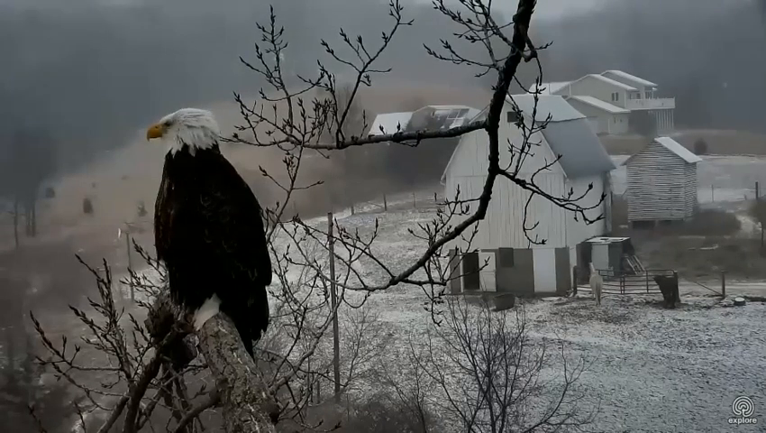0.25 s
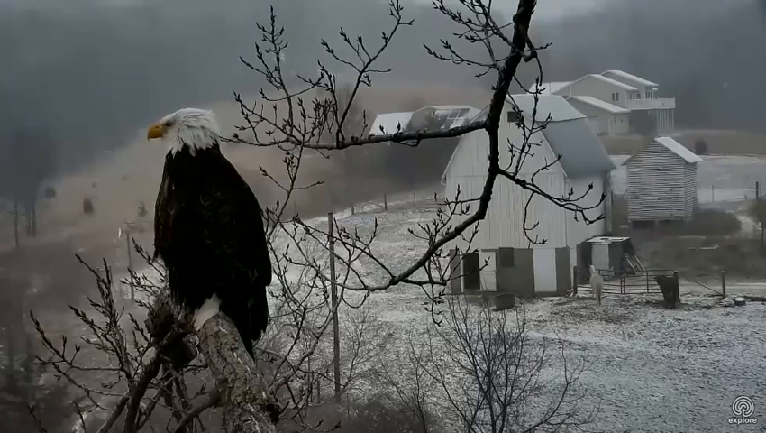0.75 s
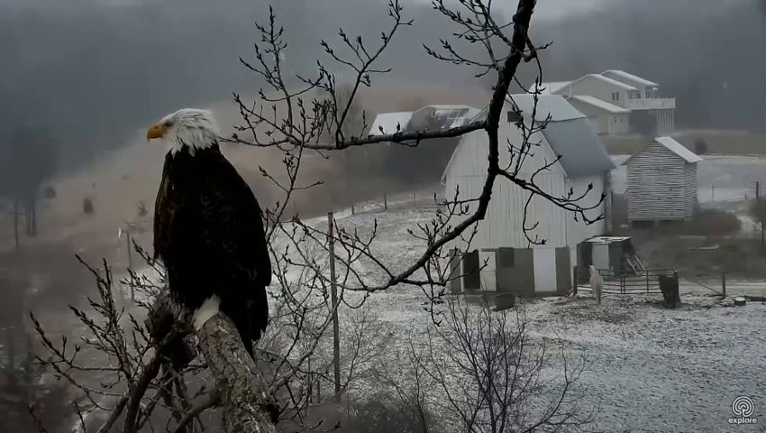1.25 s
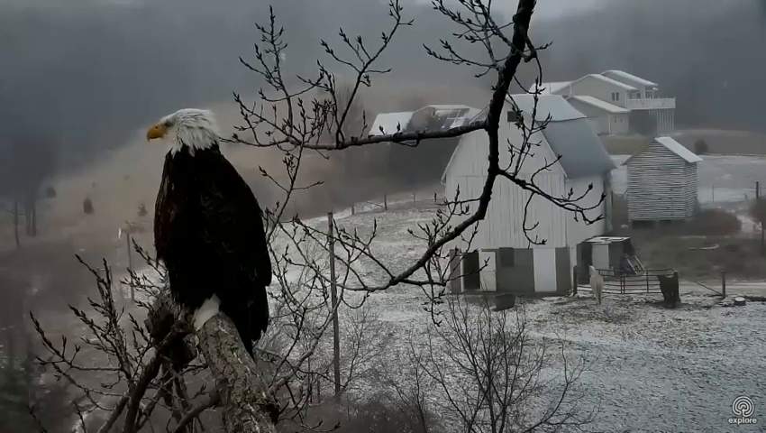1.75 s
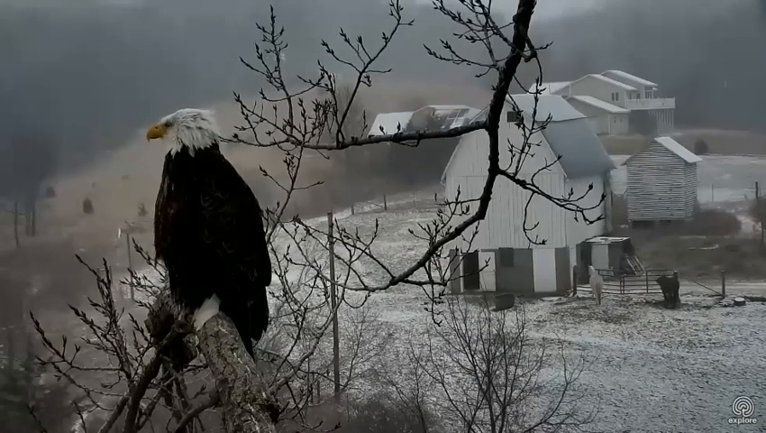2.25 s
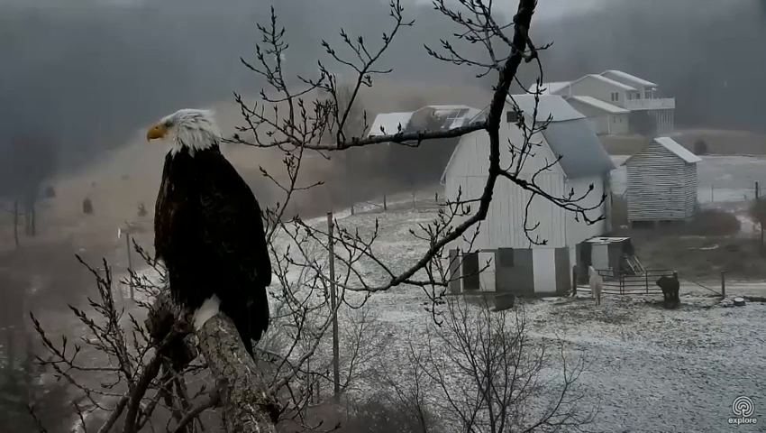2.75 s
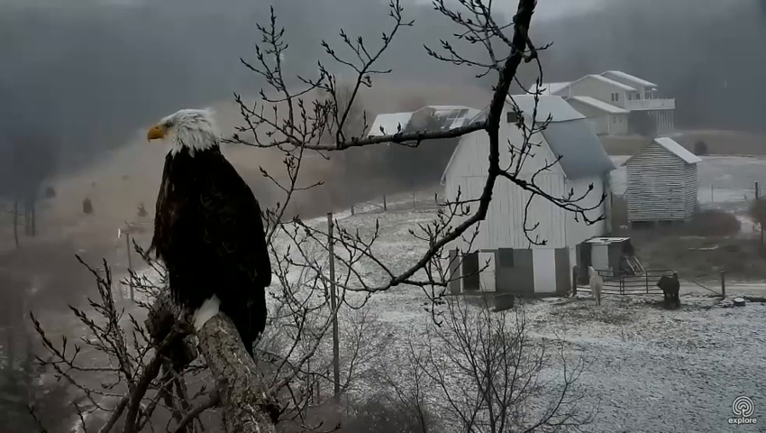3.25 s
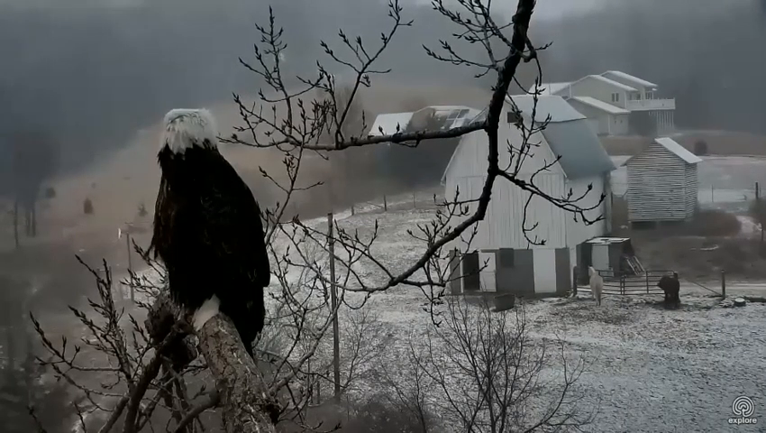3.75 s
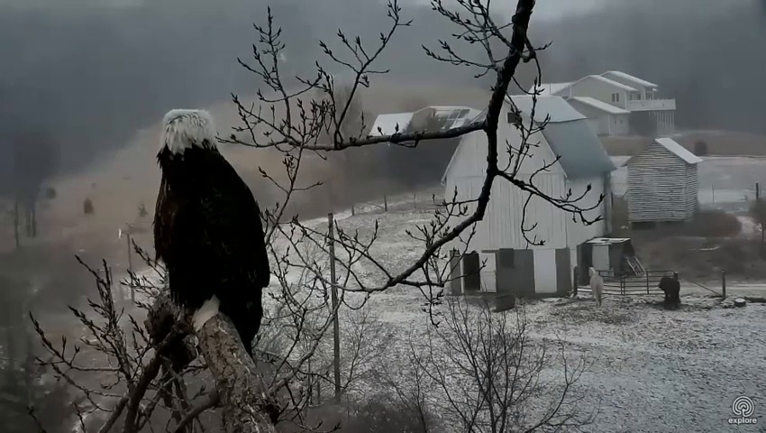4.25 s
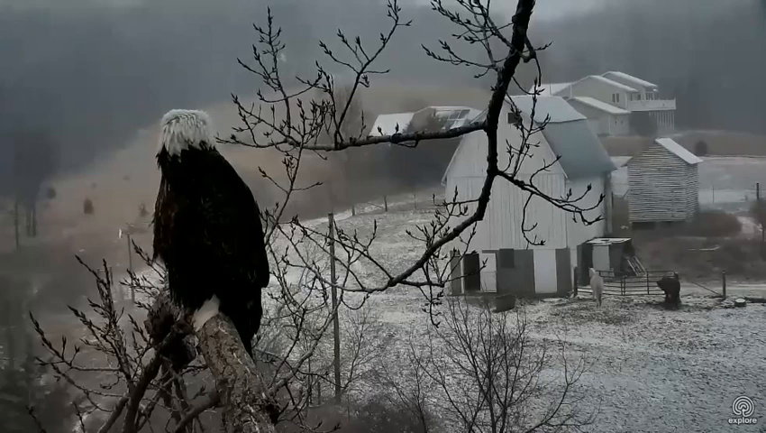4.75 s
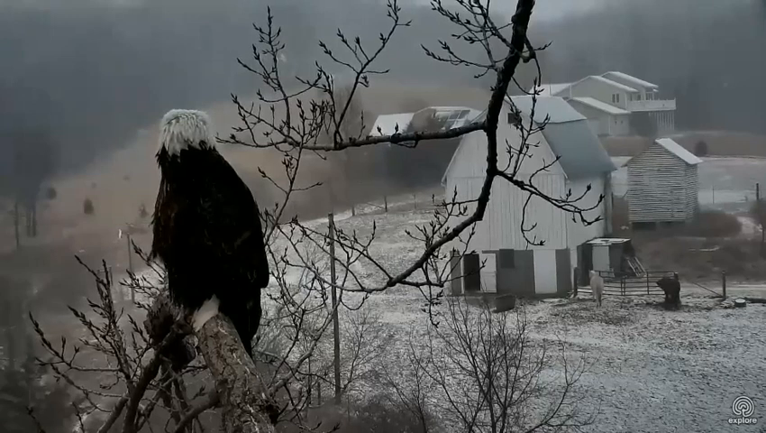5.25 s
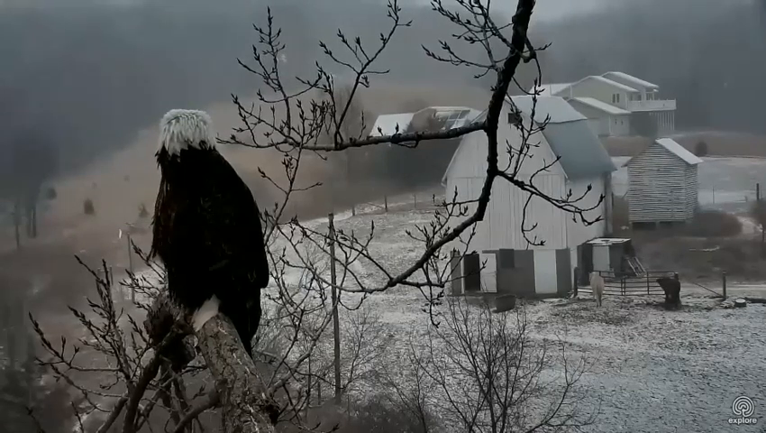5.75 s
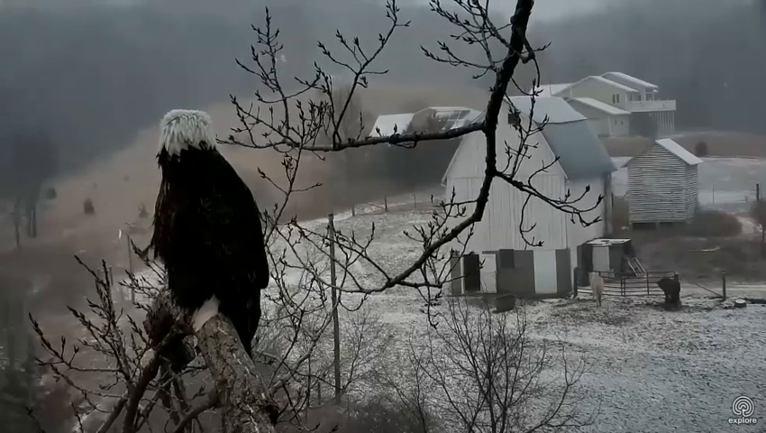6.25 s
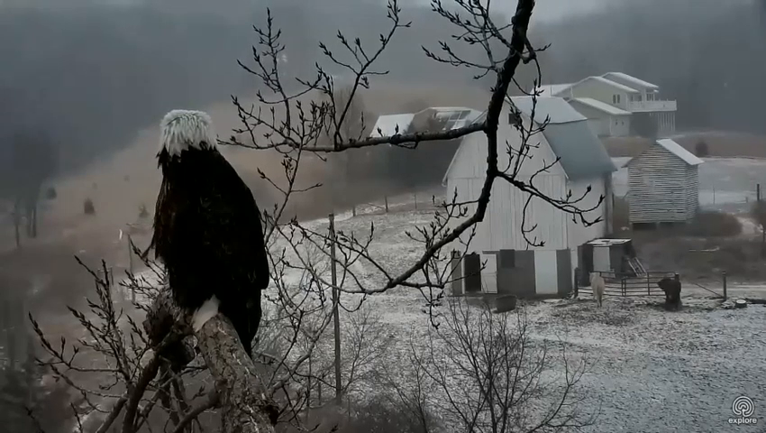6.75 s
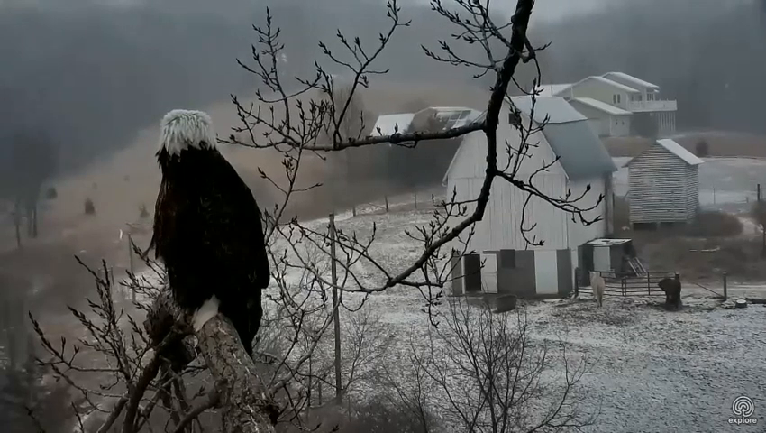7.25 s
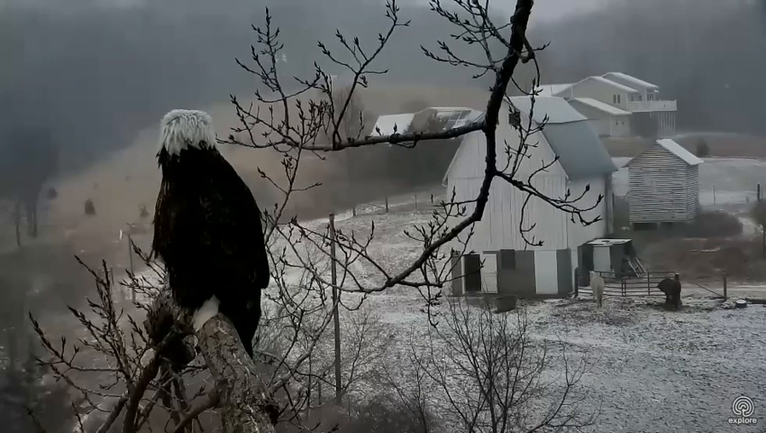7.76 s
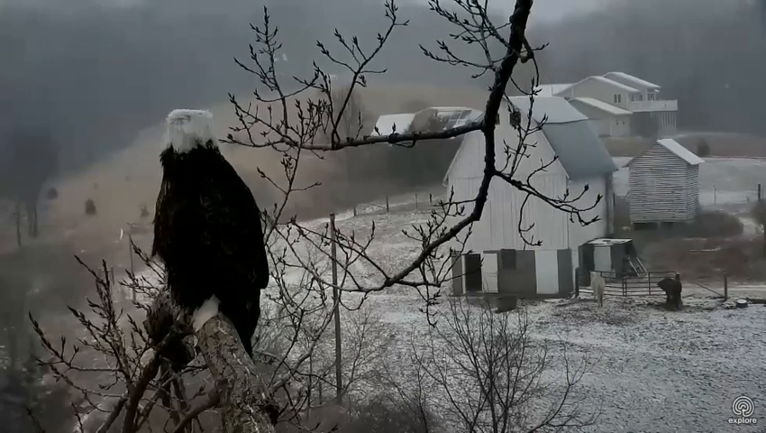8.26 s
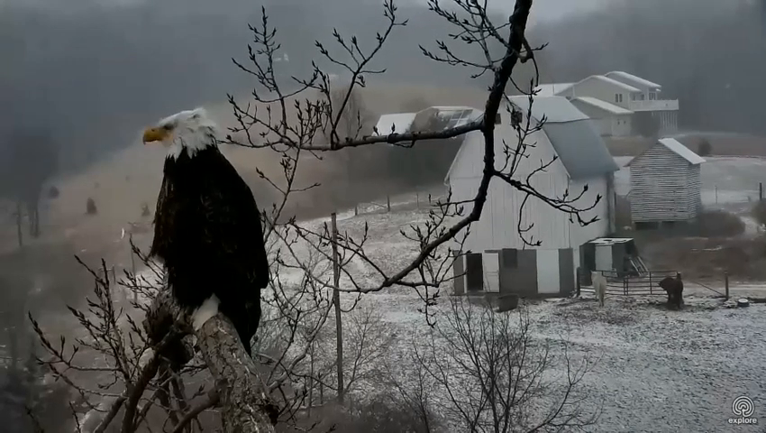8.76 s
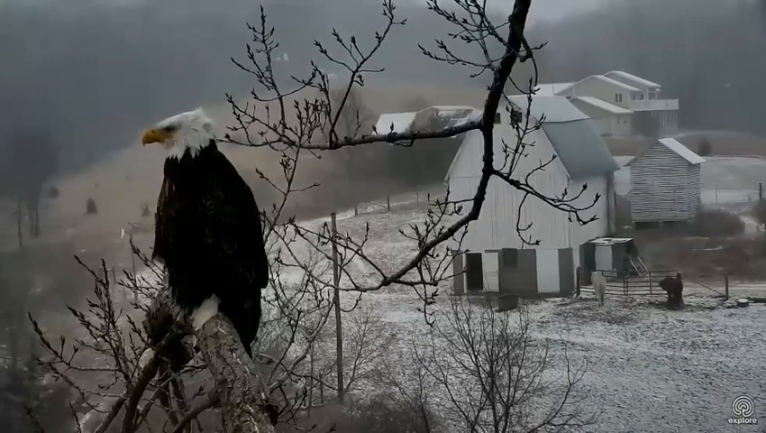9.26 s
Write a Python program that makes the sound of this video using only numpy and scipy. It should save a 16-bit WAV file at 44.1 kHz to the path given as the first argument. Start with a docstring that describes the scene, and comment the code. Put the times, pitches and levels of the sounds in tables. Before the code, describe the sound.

In open snowy farmland, low wind throbs and thumps against a low-quality microphone. Faint high tweets from small songbirds come singly and in little clusters, with a few tiny ticks of flakes on the housing. Late on, one nearer bird gives a short harsh buzz among falling chirps, a distant twitter follows, and the gusts grow strongest at the close. The large perched bird stays silent.

```python
"""Tree over snowy fields: wind buffets an outdoor camera microphone while small birds call and flakes tick.
Wind is shaped noise in four eddy sizes; the far flock is many overlapping glides in air noise.
Nearer birds are gliding sines, a blurred twitter and one buzzy song of pulses through throat resonances.
Flakes ring the housing. The camera samples at 8 kHz; its weak playback filter leaves mirror images above 4 kHz."""
import sys
import numpy as np
from scipy import signal
from scipy.fft import rfft, irfft
from scipy.io import wavfile
from scipy.ndimage import uniform_filter1d

SR = 44100
rng = np.random.default_rng(int(sys.argv[2]) if len(sys.argv) > 2 else 0)


def to_wav(sig):
    """Store sig (one row per channel, or 1-D mono) as 16-bit WAV at the path in sys.argv[1].

    Samples outside -1..1 are clipped; the rate is SR.
    """
    pcm = np.clip(np.atleast_2d(sig), -1, 1) * 32767
    pcm = np.round(pcm).astype(np.int16)
    wavfile.write(sys.argv[1], SR, pcm.T)  # frames by channels


N = 419391
T = np.arange(N) / SR
BINS_HZ = np.fft.rfftfreq(N, 1 / SR)


def undb(db):
    """Amplitude factor of a level in dB."""
    return 10 ** (np.asarray(db) / 20)


def level(x, db):
    """Scale x to an RMS level in dB."""
    return x * undb(db) / np.sqrt(np.mean(x ** 2))


def colour(x, points):
    """Shape the spectrum of x by (Hz, dB) points joined on a log-frequency axis."""
    hz, db = np.transpose(points)
    gain_db = np.interp(np.log(BINS_HZ + 1e-3), np.log(hz), db)
    return irfft(rfft(x) * undb(gain_db), N)


def ring(x, modes):
    """Sum of parallel (Hz, width Hz, dB) resonances driven by x."""
    return sum(undb(db) * signal.lfilter(*signal.iirpeak(hz, hz / width_hz, SR), x) for hz, width_hz, db in modes)


def walk(rate_hz):
    """Random levels held 1 / rate_hz seconds and smoothed twice; spread near 1."""
    k = int(SR / rate_hz)
    steps = np.repeat(rng.standard_normal(N // k + 1), k)
    return 1.3 * uniform_filter1d(uniform_filter1d(steps, k), k)[:N]


def whistle(rows, fade_s=.006, waver=None):
    """Span and sound of a sine gliding along (s, Hz, dB) rows, with soft ends outside the rows."""
    s, hz, db = np.transpose(rows)
    first = max(int((s[0] - fade_s) * SR), 0)
    last = min(int((s[-1] + fade_s) * SR), N)
    span = slice(first, last)
    t = T[span]
    ends = np.clip(np.minimum(t - s[0], s[-1] - t) / fade_s + 1, 0, 1)
    fade = np.sin(np.pi / 2 * ends) ** 2
    pitch_hz = np.interp(t, s, hz) * (1 if waver is None else waver[span])
    phase = 2 * np.pi * np.cumsum(pitch_hz) / SR
    return span, np.sqrt(2) * undb(np.interp(t, s, db)) * fade * np.sin(phase)


def add(out, span, sound):
    """Mix a sound into its span."""
    out[span] += sound


def wind():
    """Four eddy sizes press on the membrane; two swell at random around the wind levels, all share a quick flap."""
    # uneven wind loudness over time, partly chance flutter, before swells and flap:
    # (time [s], rumble [dB], buffeting [dB], flutter [dB], rush [dB])
    wind_levels = [(0.0, -34, -43, -51.5, -57), (0.08, -32, -37, -44.5, -55),
                   (0.29, -31.5, -45, -49.5, -63.5), (0.48, -38.5, -45.5, -44.5, -59.5),
                   (0.84, -29.5, -33.5, -47, -53.5), (0.9, -47, -37.5, -49, -57),
                   (0.95, -30.5, -42, -44, -57), (1.35, -37.5, -37, -46.5, -57.5),
                   (2.86, -36, -41, -50, -57.5), (3.55, -39.5, -41, -51.5, -62.5),
                   (4.16, -32, -40, -51, -58), (4.42, -43, -35.5, -51, -62), (4.47, -34, -37.5, -46.5, -59),
                   (4.82, -45.5, -44.5, -52, -60), (4.9, -31, -36.5, -50.5, -60.5),
                   (5.06, -41.5, -42, -51.5, -63.5), (5.3, -27, -40, -46, -59.5),
                   (5.48, -42.5, -37.5, -48.5, -59.5), (6.12, -35, -38, -50.5, -59),
                   (6.67, -35, -37, -47.5, -58.5), (6.78, -42, -42, -49, -62), (6.89, -29, -41, -44, -56.5),
                   (7.07, -39, -31, -44.5, -55.5), (7.47, -30, -37, -42, -55), (8.08, -38, -37, -47, -56.5),
                   (8.21, -31.5, -37, -41, -53.5), (8.26, -26.5, -44, -49, -66),
                   (8.37, -31.5, -36, -43, -52.5), (8.62, -35, -33.5, -39.5, -49.5),
                   (9.0, -36, -35, -41, -51), (9.3, -33.5, -33.5, -38.5, -46.5),
                   (9.4, -24, -32.5, -41, -43.5), (9.51, -34, -32, -41, -46)]
    # relative wind spectrum: (frequency [Hz], level per Hz [dB])
    wind_spectrum = [(1.8, -31), (3.0, 11.5), (16, 7.5), (31, 4.5), (130, -11.5), (173, -16.5), (225, -19),
                     (629, -43), (900, -50), (1170, -73), (1980, -120)]
    # eddies from large to small, one per level column: (centre [Hz], swell spread [dB])
    eddy_sizes = [(22, 1.5), (90, 0), (270, 0.7), (600, 0)]
    swells_per_s, flap_db, flaps_per_s = 11, 1.6, 17

    s, *eddy_db = np.transpose(wind_levels)
    noise = rfft(colour(rng.standard_normal(N), wind_spectrum))
    centre_hz = np.transpose(eddy_sizes)[0]
    place = np.interp(np.log(BINS_HZ + 1e-3), np.log(centre_hz), np.arange(len(eddy_sizes)))
    flap = flap_db * walk(flaps_per_s)
    out = 0
    for k, (_, swell_db) in enumerate(eddy_sizes):
        # triangular bands crossfade between neighbouring centres
        eddies = irfft(noise * np.clip(1 - abs(place - k), 0, 1), N)
        # mostly even out slow noise swells over 1/6 s, so the typed levels set the loudness
        eddies = eddies / np.sqrt(uniform_filter1d(eddies ** 2, size=SR // 6)) ** .9
        envelope_db = np.interp(T, s, eddy_db[k]) + swell_db * walk(swells_per_s) + flap
        out = out + level(eddies, 0) * undb(envelope_db)
    return out


def far_chatter(count=2200):
    """Many short overlapping glides melt into the hiss of air in the twigs."""
    # flock and air envelope, before a small fixed gain: (time [s], level [dB])
    far_levels = [(0.0, -52.5), (0.87, -52), (1.3, -53), (2.4, -53), (2.9, -52), (3.6, -52.5), (4.7, -51.5),
                  (6.1, -51.5), (8.1, -50.5), (8.45, -49), (9.16, -51), (9.51, -46.5)]
    # relative spectrum with the housing resonance near 2.4 kHz: (frequency [Hz], level per Hz [dB])
    air_spectrum = [(290, -19), (500, -9.5), (611, -7.5), (1060, -7), (1130, -8), (1300, -8), (1410, -8),
                    (2170, -4.5), (2470, -4), (3320, -13.5), (3990, -20), (5190, -64), (8780, -120)]

    flock = np.zeros(N)
    for when, pitch, glide, length, size in rng.random((count, 5)):
        start_s, hz = when * N / SR, 1900 + 2050 * pitch
        end_s, end_hz = start_s + .005 + .02 * length, hz * (.8 + .4 * glide)
        db = 7 * size
        add(flock, *whistle([(start_s, hz, db), (end_s, end_hz, db)]))
    air = level(rng.standard_normal(N), 0) * undb(.6 * walk(12))
    mix = air + level(flock, -14)
    s, db = np.transpose(far_levels)
    return level(colour(mix, air_spectrum), 0.27) * undb(np.interp(T, s, db))


def flakes():
    """A tap and a small bounce ring the housing for a moment."""
    # taps before smoothing and ringing: (time [s], impulse level [dB])
    ticks = [(0.515, -43), (1.1202, -37.5), (1.496, -42), (1.797, -40), (4.669, -46), (5.3855, -31)]
    # housing resonances: (frequency [Hz], width [Hz], gain [dB])
    housing_modes = [(1300, 900, 2), (2390, 700, 12)]
    bounce_s, bounce_gain = .0015, .65

    taps = np.zeros(N)
    for s, db in ticks:
        taps[int(s * SR)] += undb(db)
        taps[int((s + bounce_s) * SR)] += bounce_gain * undb(db)
    # a soft flake gives a rounded push, 0.5 ms long
    push = np.convolve(taps, np.hanning(22))[:N]
    return ring(push, housing_modes)


def twitter():
    """A distant group: short notes at random times and pitches, each sliding a little, low and blurred."""
    # bouts: (start [s], end [s], loudest-note level [dB])
    bouts = [(4.371, 4.676, -58.5), (4.802, 5.076, -55.5), (5.902, 6.401, -61), (8.748, 9.5, -53.5)]
    centre_hz, pitch_spread, note_s, notes_per_s = 2350, .14, .018, 80

    out = np.zeros(N)
    for start_s, end_s, loudest_db in bouts:
        count = int((end_s - start_s) * notes_per_s)
        for when, pitch, glide, size in rng.random((count, 4)):
            s = start_s + when * (end_s - start_s - note_s)
            hz = centre_hz * (1 + pitch_spread * (2 * pitch - 1))
            end_hz = hz * (.92 + .16 * glide)
            db = loudest_db - 8 * size
            add(out, *whistle([(s, hz, db), (s + note_s, end_hz, db)]))
    return out


def buzz():
    """Two sides of the voice box pulse at their own rates and ring the throat; roughness shakes and adds hiss."""
    # song, two harsh bursts around a purer trill: (time [s], lower pulse rate [Hz], upper pulse rate [Hz],
    # level before swells [dB], roughness [0-1], extra third resonance gain [dB], extra fourth [dB])
    song = [(8.25, 469, 546, -58, .5, -9, -12), (8.28, 469, 546, -44.5, .7, 0, -14),
            (8.305, 469, 546, -46, .62, -1, -1), (8.34, 472, 545, -44.5, .62, -2, -4),
            (8.365, 499, 543, -42.5, .5, -4, -13), (8.41, 492, 537, -43, .33, -18, -17),
            (8.452, 501, 546, -46, .38, -20, -19), (8.475, 499, 548, -43, .55, -9, -9),
            (8.501, 499, 546, -45, .75, -1, -15), (8.53, 473, 546, -44, .72, -1, -13),
            (8.552, 474, 546, -47.5, .75, 0, -17), (8.60, 474, 546, -62, .75, 0, -17)]
    # throat resonances: (frequency [Hz], width [Hz], gain [dB])
    throat_modes = [(1990, 280, 1), (2510, 520, 7), (3100, 600, 2), (3760, 300, 3)]

    s, *columns = np.transpose(song)
    low_hz, high_hz, db, rough, third_db, fourth_db = (np.interp(T, s, c) for c in columns)
    voice = 0
    for rate_hz in low_hz, high_hz:
        cycles = np.cumsum(rate_hz * (1 + .04 * rough ** 2 * walk(150))) / SR
        pulses = level(np.diff(np.floor(cycles), prepend=0), -3)
        pulses = pulses * undb(5 * rough ** 2 * rng.standard_normal(N))
        voice = voice + (1 - rough) * pulses
    voice = voice + rough ** 2 * rng.standard_normal(N)
    # the windpipe steepens the two lower resonances; the two upper ones come and go with the beak
    lower = ring(ring(voice, throat_modes[:2]), [(2480, 1250, 0)])
    third = undb(third_db) * ring(voice, throat_modes[2:3])
    fourth = undb(fourth_db) * ring(voice, throat_modes[3:])
    high_pass = signal.butter(6, 1850, "high", fs=SR, output="sos")
    voice = signal.sosfilt(high_pass, lower + third + fourth)
    singing = (T > s[0]) & (T < s[-1])
    return level(voice, 0) * undb(db + 2.2 * rough * walk(130)) * singing


def chirps():
    """Whistles and nasal chups of nearer birds are gliding sines, made husky by the moving air on the way."""
    # chirps: (time [s], length without fades [s], start pitch [Hz], middle [Hz], end [Hz],
    # level at the strongest pitch, before huskiness [dB])
    arcs = [ (0.14, .025, 2760, 2870, 2980, -51), (0.185, .025, 3550, 3580, 3610, -52),
            (0.43, .05, 1550, 1530, 1510, -50), (0.505, .065, 3080, 3150, 3220, -53),
            (0.575, .02, 3900, 3800, 3900, -51), (0.72, .06, 2320, 2340, 2360, -55),
            (0.845, .05, 2550, 2900, 3350, -56), (0.935, .03, 1780, 1720, 1640, -52),
            (1.005, .025, 2920, 2760, 2580, -53), (0.73, .02, 3400, 3490, 3580, -50),
            (0.762, .068, 3020, 2530, 2240, -54), (1.49, .015, 3380, 3280, 3190, -48.5),
            (1.66, .025, 3810, 3490, 3170, -48), (2.805, .013, 2910, 2820, 2740, -51),
            (2.948, .021, 2700, 3000, 2500, -45), (2.975, .015, 3080, 3000, 2910, -48),
            (3.209, .022, 2300, 3250, 3440, -48.5), (3.59, .04, 3780, 3820, 3880, -55),
            (3.75, .035, 2870, 2850, 2800, -56), (3.787, .025, 2720, 2450, 2200, -56),
            (4.2, .03, 3240, 3200, 3180, -57), (5.775, .05, 2260, 2150, 2110, -56),
            (5.866, .016, 3320, 3480, 3640, -51), (9.22, .045, 2620, 2600, 2560, -50),
            (3.705, .02, 2910, 2900, 2890, -52), (3.84, .035, 2950, 3720, 3930, -50),
            (3.895, .035, 3050, 2830, 2950, -52.5), (4.055, .05, 3300, 3760, 3910, -52),
            (4.135, .02, 3620, 3620, 3620, -49), (4.38, .03, 2380, 2350, 2330, -53),
            (5.095, .015, 3990, 3870, 3750, -51), (5.31, .015, 2750, 2970, 3190, -49),
            (5.77, .025, 3720, 3560, 3400, -52), (5.832, .033, 2460, 3480, 3820, -48),
            (5.92, .09, 2990, 3300, 3310, -48), (5.935, .01, 3010, 2760, 2510, -52),
            (5.96, .015, 2980, 2760, 2540, -50), (6.065, .02, 3990, 3700, 3400, -52),
            (6.125, .022, 2760, 2570, 2350, -50), (6.247, .023, 3450, 2870, 2200, -48.5),
            (6.405, .045, 3550, 2850, 1950, -51.5), (6.445, .013, 2920, 2870, 2830, -51),
            (6.485, .045, 3280, 3450, 3650, -52), (6.565, .035, 2870, 3250, 3400, -50),
            (6.848, .022, 2950, 2700, 2500, -48), (7.075, .05, 2640, 2810, 3090, -52),
            (7.61, .025, 2630, 2540, 2450, -49), (7.745, .03, 3010, 3030, 3060, -54),
            (7.9, .07, 3660, 3900, 3920, -50), (8.18, .015, 3060, 2930, 2810, -50),
            (8.213, .07, 2335, 2355, 2340, -43.5), (8.27, .018, 3210, 2900, 2600, -43),
            (8.348, .04, 3300, 2850, 2400, -38), (8.478, .027, 3500, 2980, 2500, -41),
            (8.52, .03, 3000, 2930, 2870, -45), (8.608, .04, 3810, 3000, 2250, -45),
            (8.724, .044, 3490, 2830, 2270, -45.5), (9.17, .013, 2770, 3120, 3470, -45),
            (9.19, .015, 2950, 2780, 2620, -54), ]
    # whistles whose pitch bends several times, one curve each:
    # (time [s], pitch [Hz], level before huskiness [dB])
    bent_whistles = [
        [(3.002, 2150, -56), (3.015, 2360, -50), (3.045, 2480, -50), (3.06, 2640, -48), (3.075, 3060, -53),
         (3.095, 3200, -55), (3.14, 3230, -66)],
        [(3.27, 2350, -55), (3.29, 2370, -53), (3.32, 2800, -55), (3.345, 3140, -56), (3.37, 3480, -66)],
        [(5.362, 2460, -52), (5.374, 2550, -47), (5.395, 2550, -51.5), (5.41, 2680, -54), (5.435, 3100, -58)],
        [(6.005, 3000, -58), (6.03, 2660, -57), (6.06, 2870, -56), (6.125, 3090, -57), (6.15, 3400, -57),
         (6.18, 3530, -58), (6.215, 3640, -54), (6.23, 3620, -66)],
        [(9.255, 2170, -52), (9.285, 2650, -50), (9.305, 3320, -56), (9.335, 3430, -59)],
    ]
    # nasal chups: (time [s], length without fades [s], start fundamental [Hz], end fundamental [Hz],
    # level before harmonic gain and huskiness [dB])
    chups = [(0.002, 0.018, 867, 795, -54.5), (2.85, 0.026, 873, 780, -61), (4.102, 0.026, 825, 780, -60.5),
             (6.348, 0.027, 915, 790, -57)]
    # gains of harmonics 2, 3 and 4, the ones heard [dB]
    chup_harmonics_db = (1.5, 8.5, -9)
    # chirps weaken away from the housing resonance and towards their ends
    strongest_hz, fall_db_per_khz, end_drop_db = 2400, 9.5, 4
    waver_depth, wavers_per_s = .007, 110

    out, part = np.zeros(N), np.linspace(0, 1, num=9)
    waver = 1 + waver_depth * walk(wavers_per_s)
    for s, length_s, *pitches_hz, db in arcs:
        # one smooth arc through the three pitches
        hz = np.polyval(np.polyfit([0, .5, 1], pitches_hz, 2), part)
        weaker_db = fall_db_per_khz * abs(hz - strongest_hz) / 1000 + end_drop_db * (2 * part - 1) ** 2
        rows = np.transpose([s + length_s * part, hz, db - weaker_db])
        add(out, *whistle(rows, waver=waver))
    for rows in bent_whistles:
        add(out, *whistle(rows, waver=waver))
    for s, length_s, start_hz, end_hz, db in chups:
        for harmonic, gain_db in enumerate(chup_harmonics_db, start=2):
            start = (s, harmonic * start_hz, db + gain_db)
            end = (s + length_s, harmonic * end_hz, db + gain_db)
            add(out, *whistle([start, end]))
    huskiness = 1 + .12 * walk(70) + .33 * walk(500)
    return out * huskiness


def echo(birds):
    """Soft, short echo off trunk and ground: decaying noise, 37 ms time constant, unit energy."""
    t = np.arange(SR // 5) / SR
    tail = rng.standard_normal(SR // 5) * np.exp(-t / 0.037)
    return undb(-8) * signal.fftconvolve(birds, tail / np.sqrt(np.sum(tail ** 2)))[:N]


def scene():
    """Wind, far flock and flakes with the nearer birds and their echo."""
    birds = chirps() + buzz() + twitter()
    return (wind() + far_chatter() + birds + echo(birds) + flakes())[None]


def record(dry):
    """Keep the band under half the camera rate, leak its mirror images, add link hiss and a top cut."""
    # leak of the images around the camera rate: (frequency [Hz], gain [dB])
    mirror_leak = [(4000, -1.5), (4500, -5.5), (5100, -14.5), (5700, -22), (6100, -33), (7200, -90),
                   (8800, -74), (9600, -50), (10400, -36.5), (11300, -28)]
    # leak of the folded image: (frequency [Hz], gain [dB])
    fold_leak = [(7000, -102), (7900, -44), (8600, -37), (9300, -27), (10000, -20)]
    camera_hz, link_hz, top_hz = 8000, 22050, 11600
    edge_s, hiss_db = .004, -64  # hiss level before the top cut

    edges = np.clip(np.minimum(T, T[-1] - T) / edge_s, 0, 1)
    kept = irfft(rfft(dry[0] * edges) * (BINS_HZ < camera_hz / 2), N)
    images = 2 * kept * np.cos(2 * np.pi * camera_hz * T)
    mirror = colour(images, [(camera_hz / 2 - 1, -120)] + mirror_leak)
    # the next mirror, under twice the camera rate, folds back when the link samples it again
    folded = 2 * kept * np.cos(2 * np.pi * (link_hz - 2 * camera_hz) * T)
    fold = colour(folded, fold_leak)
    hiss = level(colour(rng.standard_normal(N), [(300, -13.0), (3000, -4.0), (10000, -9)]), hiss_db)
    top_cut = signal.cheby2(14, 60, top_hz, fs=SR, output="sos")
    return signal.sosfilt(top_cut, kept + mirror + fold + hiss)[None]


dry = scene()
out = record(dry)
to_wav(out)
```